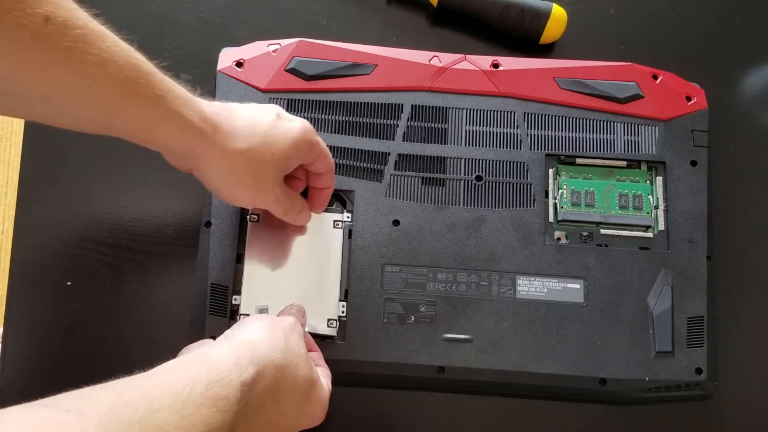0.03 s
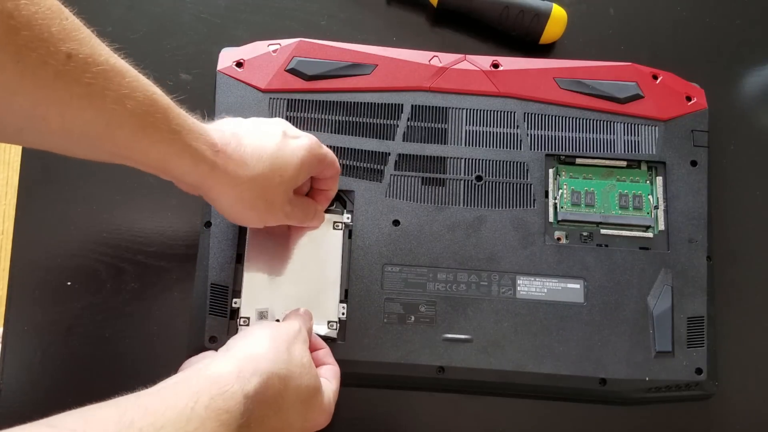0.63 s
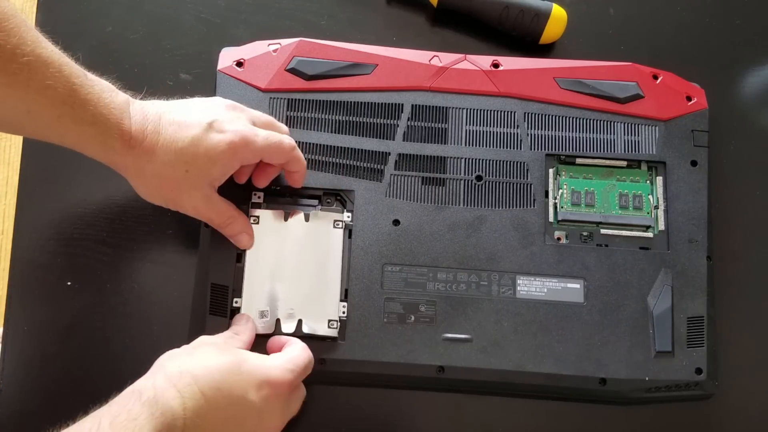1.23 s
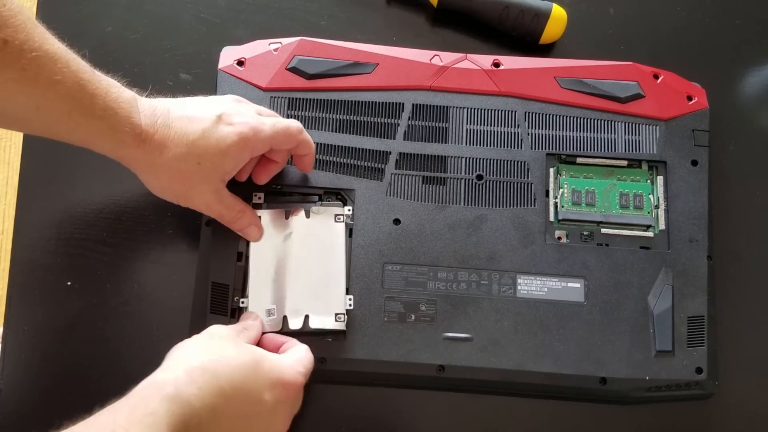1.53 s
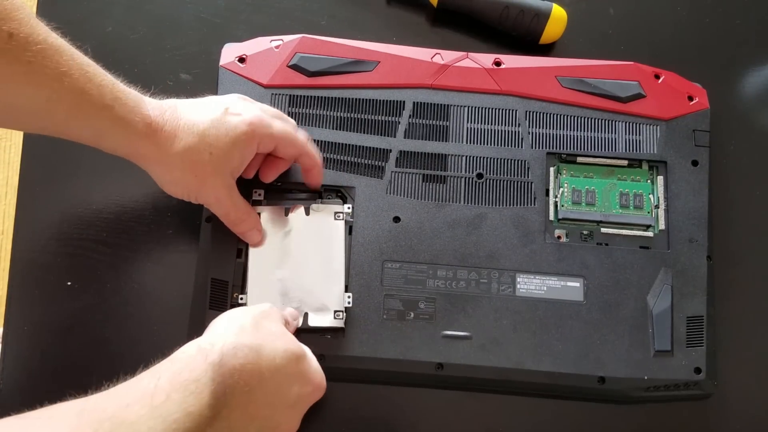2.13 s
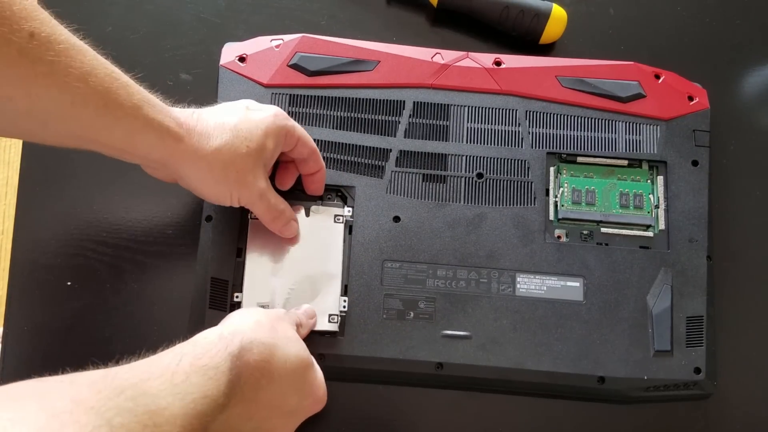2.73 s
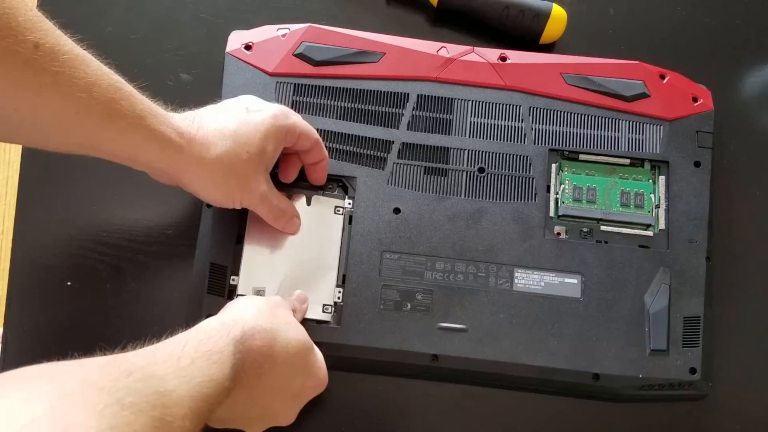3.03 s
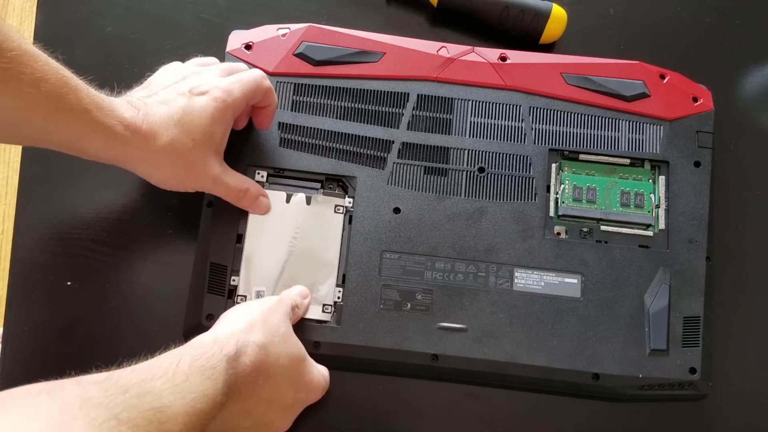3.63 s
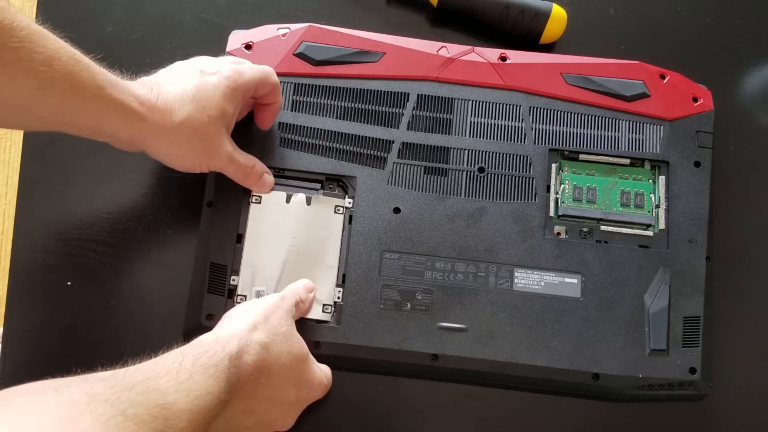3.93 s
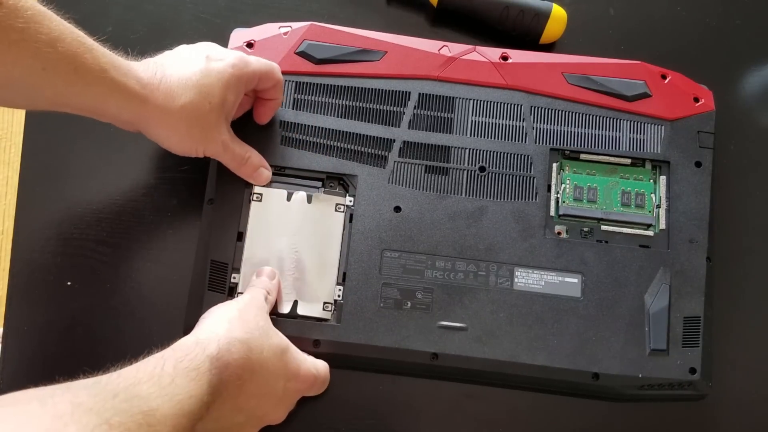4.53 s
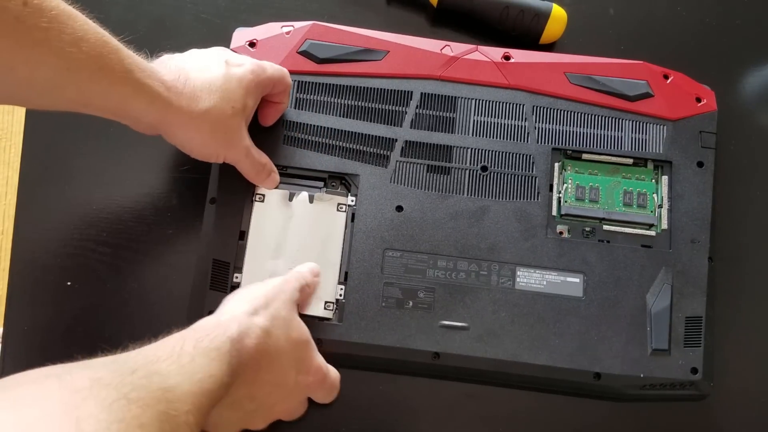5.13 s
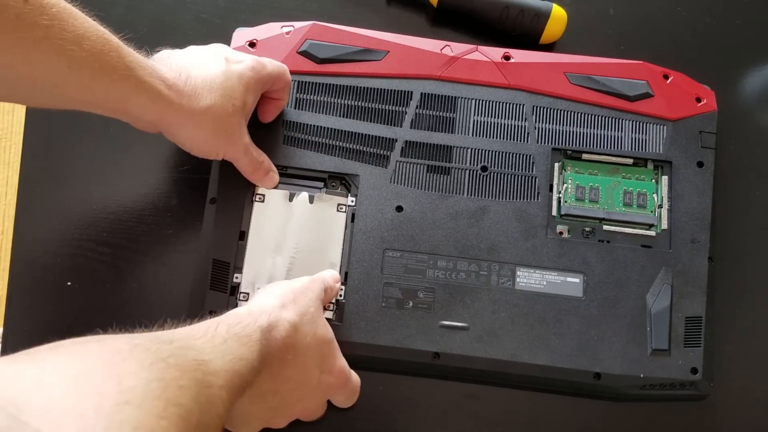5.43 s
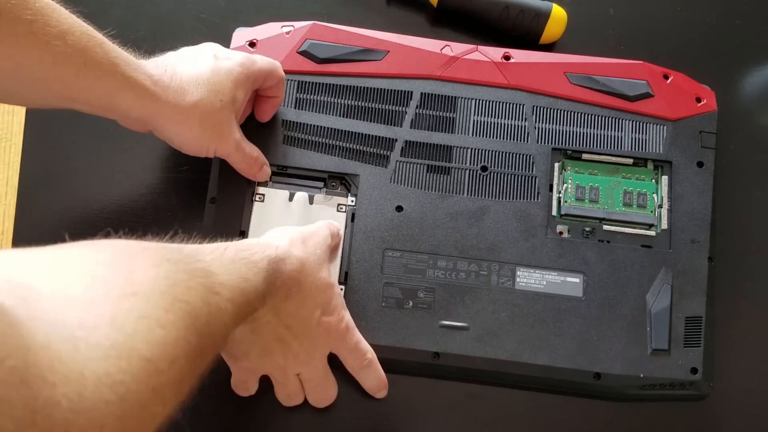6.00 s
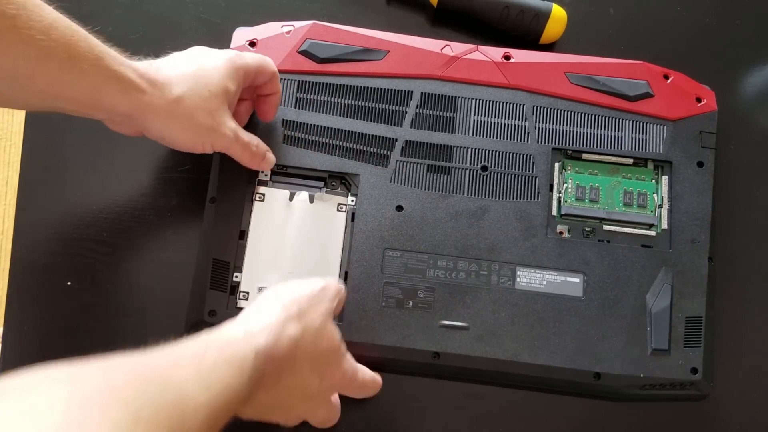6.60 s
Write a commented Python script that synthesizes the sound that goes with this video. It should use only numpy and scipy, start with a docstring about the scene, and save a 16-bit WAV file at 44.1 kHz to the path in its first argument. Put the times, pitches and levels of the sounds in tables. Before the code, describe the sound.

A small drive in a metal caddy is slid and pressed into the plastic bay of a laptop. A faint tick leads into soft scrapes and light taps, with bare metal corners clicking on the edges. Louder knocks ring the hollow case around the middle and again a little later, then the rubbing and ticking thin out. It is heard close, in stereo, in a quiet small room with a faint hum.

```python
"""A faint metal tick, then scrapes and light taps: a small drive in a metal caddy is being worked into
the plastic bay of a laptop on a desk. Each push grinds and hisses with tiny slips, bare corners tick
on the edges, and the caddy drops in with a few knocks that ring the hollow case. Heard from close by
on a pair of microphones, in a quiet small room with a short echo and a faint hum."""
import sys
import numpy as np
from scipy import signal
from scipy.fft import rfft, irfft, next_fast_len
from scipy.io import wavfile
from scipy.ndimage import uniform_filter1d

SR = 44100
rng = np.random.default_rng(int(sys.argv[2]) if len(sys.argv) > 2 else 0)


def dump_mix(stems):
    """Bounce the given channels to the path in sys.argv[1] as a 16-bit WAV at rate SR."""
    frames = np.atleast_2d(stems).T  # one column per channel
    limited = np.clip(frames, -1, 1)  # hard clip at full scale
    pcm = np.round(limited * 32767).astype(np.int16)
    wavfile.write(sys.argv[1], SR, pcm)


N = 298116
TIME = np.arange(N) / SR

# Knocks in the bay, close to the microphones. Each row: start in seconds, thud, clack and tick
# levels in dB, lowest pitch in Hz, favoured pitch in Hz, scuff t60 in seconds.
KNOCKS = [(1.409, -47, -35, -42.5, 130, 1970, 0.01), (1.418, -52, -50, -40.5, 130, 9300, 0.02),
          (1.4347, -45.5, -38, -47.5, 130, 1430, 0.025), (2.288, -47.5, -45, -49, 120, 620, 0.0074),
          (2.9008, -41, -24.5, -35.5, 195, 1350, 0.024), (3.073, -33.5, -23, -43.5, 110, 1700, 0.014),
          (3.083, -47, -31, -42, 110, 454, 0.0075), (3.301, -54, -44, -41.5, 99, 1070, 0.014),
          (3.9066, -49, -45.5, -40, 130.8, 1090, 0.0057), (4.427, -39.5, -27.5, -37.5, 184, 1040, 0.022),
          (4.45, -47, -43.5, -34.5, 129, 1300, 0.0037), (4.683, -53, -21, -32.5, 112, 1480, 0.0069),
          (4.688, -29, -31, -32.5, 128, 664, 0.008)]

def knocks():
    """The caddy drops or snaps against the bay: thud, clack and tick at once."""
    out = np.zeros((2, N))
    for start, *levels_db, lowest_hz, favoured_hz, scuff_t60 in KNOCKS:
        add(out, strike_case(levels_db, favoured_hz, scuff_t60, lowest_hz), start)
    return out


# Taps on the plastic. Each row: start in seconds, clack level in dB, favoured pitch in Hz.
TAPS = [(.554, -57, 1000), (.579, -46.5, 920), (.682, -38, 1600), (.879, -52.5, 1310), (0.965, -52, 800),
        (1.044, -47.5, 1620), (1.068, -39, 885), (1.278, -49.5, 1300), (1.671, -56, 403),
        (1.722, -43.5, 1490), (1.742, -42, 1530), (2.063, -52, 1440), (2.24, -55, 594), (2.64, -41, 710),
        (2.772, -51, 910), (3.066, -29, 1300), (5.124, -49, 800), (5.361, -50.5, 1060),
        (5.953, -53.5, 1060)]

def taps():
    """The caddy, damped by the fingers, bumps the plastic: mostly clack."""
    out = np.zeros((2, N))
    for start, db, favoured_hz in TAPS:
        add(out, strike_case([db - 15, db, db - 25], favoured_hz, scuff_t60=0.021), start)
    return out


# Ticks at the bay's edges. Each row: start in seconds, tick level in dB, favoured pitch in Hz.
TICKS = [(0.069, -56.5, 5000), (.675, -50, 7000), (.714, -49, 5000), (0.744, -52.5, 9500),
         (1.745, -49.5, 4530), (2.275, -38, 3250), (3.4433, -39, 13700), (4.638, -47, 6660),
         (4.82, -51, 6370), (5.349, -52, 4730), (5.704, -41.5, 4070), (6.633, -59, 2420)]

def ticks():
    """A bare metal corner catches an edge: mostly treble."""
    out = np.zeros((2, N))
    for start, db, favoured_hz in TICKS:
        add(out, strike_case([db - 24.5, db - 18, db], favoured_hz, scuff_t60=0.0055), start)
    return out


# Modes of the case with the caddy in it. Each row: pitch in Hz, level in dB, t60 in seconds.
CASE_MODES = [(74, -9.5, 0.18), (100.3, -6.5, 0.07), (128.2, -7, 0.15), (158.9, -5.5, 0.23),
              (213, -14.5, 0.043), (247.6, -12.5, 0.17), (291.6, -4.5, 0.061), (373, -5.5, 0.084),
              (495.5, -7, 0.05), (670, -1, 0.027), (800, 1.5, 0.018), (1036, -5, 0.056), (1300, -3, .025),
              (1480, -1, 0.009), (1911, -3, 0.035), (2300, 0, 0.013), (2470, -28, 0.0079),
              (3190, -33, 0.011), (4324, -4.5, 0.02), (5000, -3, 0.012), (6500, -21, 0.0098),
              (8000, -48, 0.0077), (10500, -32, 0.0099)]

def case_ring(t, scatter_db=3.0, detune=0.0092):
    """The hollow case rings, its modes weighted by where the blow lands and shifted by the grip."""
    hz, mode_db, t60 = np.transpose(CASE_MODES)
    weight, polarity, spread, grip = rng.standard_normal((4, len(hz)))
    gain = from_db(mode_db + scatter_db * weight) * np.sign(polarity)
    # short waves reach the two microphones out of step
    skew = .5 * spread * np.sqrt(1 - at_hz(MIC_LIKENESS, hz))
    phase = 2 * np.pi * np.outer(hz * (1 + detune * grip), t)
    decay = gain[:, None] * dying(t, t60[:, None])
    return np.array([(decay * np.sin(phase + side * skew[:, None])).sum(0) for side in (1, -1)])


# The crack at the point of contact. Each row: frequency in Hz, level in dB.
CRACK_SPECTRUM = [(100, -18), (400, -1), (1500, -4.5), (2600, -7.5), (4300, -10), (5600, -16.5),
                  (8000, -15), (9500, -20), (11000, -16), (16000, -21)]

def crack(t, scuff_t60, longest_t60=0.78):
    """A few milliseconds of crushing contact, with energy at every frequency."""
    burst = rfft(diffuse(len(t)) * dying(t, scuff_t60))
    flattened = irfft(burst / (abs(burst) + 0.017 * abs(burst).mean()), len(t))
    fade_out = (1 - t / t[-1]) ** 2
    snap = colour(flattened * dying(t, longest_t60) * fade_out, CRACK_SPECTRUM)
    return snap / snap[:, :SR // 500].std()


# The three zones of a blow: upper edges of thud, clack and tick in Hz.
ZONE_TOPS_HZ = [500, 2800, 17000]

def strike_case(levels_db, favoured_hz, scuff_t60, lowest_hz=228, crack_db=9.0, blow_s=0.0019):
    """One blow cracks and rings; only knocks rock the whole case and reach below the default lowest_hz."""
    t = TIME[:SR // 4]
    blow = case_ring(t) + from_db(crack_db) * crack(t, scuff_t60)
    blow = favour(blow, favoured_hz, boost_db=8.0, sharpness=3.6)
    # the longer the scuff, the more gently the force builds
    blow *= 1 - np.exp(-t / (0.069 * scuff_t60))
    out = 0
    for level_db, low, high in zip(levels_db, [lowest_hz, *ZONE_TOPS_HZ], ZONE_TOPS_HZ):
        zone = band(blow, low, high)
        power = uniform_filter1d((zone ** 2).mean(0), int(blow_s * SR), mode="constant")
        # neighbouring zones take opposite signs so that they join without a notch
        out = from_db(level_db) * zone / np.sqrt(power.max()) - out
    return out


# Metal rubbing plastic, a low grind and a high hiss. Each row: frequency in Hz, level in dB.
GRIND_SPECTRUM = [(60, -7.5), (150, 5), (230, -4), (380, 1), (800, 3), (1300, -3.5), (2000, -1),
                  (2800, -11.5), (4500, -42.5)]
HISS_SPECTRUM = [(1500, -48), (2800, -4), (4200, 4), (5800, -3.5), (8000, -3), (9500, -9.5), (13000, -4.5),
                 (16000, -6)]
# Pushes along the bay. Each row: hardest moment in seconds, length in seconds, grind level in dB,
# favoured pitch in Hz.
PUSHES = [(0.568, 0.037, -54, 920), (0.625, 0.051, -52.5, 3620), (0.736, 0.21, -61.5, 3820),
          (0.986, 0.41, -64.5, 1730), (1.066, 0.098, -50, 1020), (1.176, 0.45, -60.5, 2480),
          (1.413, 0.08, -44.5, 1800), (1.691, 0.11, -54, 365), (1.734, 0.11, -49, 1110),
          (2.0, 0.12, -68.5, 4900), (2.14, 0.14, -61.5, 1810), (2.267, 0.048, -44, 3160),
          (2.338, 0.091, -50.5, 1740), (2.536, 0.16, -57, 1460), (2.645, 0.042, -49.5, 800),
          (2.797, 0.04, -57.5, 1790), (2.898, 0.03, -41, 1880), (3.429, 0.062, -58, 2180),
          (3.553, .08, -59, 2000), (3.854, .11, -61.5, 3000), (4.304, 0.2, -64.5, 4030),
          (4.418, 0.037, -56, 1700), (5.12, 0.47, -62, 1475), (5.671, 0.19, -53, 1660),
          (5.702, 0.067, -47, 4500), (6.094, 0.11, -62, 1060), (6.682, 0.18, -58.5, 171)]

def scrapes(slips_per_s=3000, slip_spread_db=5.0, smooth_share=0.74, judder_db=3.0):
    """Friction: a dense run of tiny slips that swells and fades with each push."""
    slipping = rng.random(N) < slips_per_s / SR
    slips = slipping * from_db(slip_spread_db * np.minimum(rng.exponential(1, N), 4))
    grain = rms_one(signal.lfilter([1], [1, -.85], slips))
    friction = diffuse(N) * (grain + smooth_share) * from_db(judder_db * drift(140))
    grind, hiss = colour(friction, GRIND_SPECTRUM), colour(friction, HISS_SPECTRUM)
    out = np.zeros((2, N))
    for peak_s, length, grind_db, favoured_hz in PUSHES:
        # a sharper edge hisses more: 6.5 dB an octave, level with the grind at 4140 Hz
        hiss_db = grind_db + 6.5 * np.log2(favoured_hz / 4140)
        span = slice(max(0, int((peak_s - length) * SR)), int((peak_s + length) * SR))
        push = from_db(-40 * abs(TIME[span] - peak_s) / length)
        for layer, level_db in (grind, grind_db), (hiss, hiss_db):
            rub = favour(layer[:, span], favoured_hz, boost_db=9.0, sharpness=1.5)
            out[:, span] += push * from_db(level_db) * rms_one(rub)
    return out


def favour(x, hz, boost_db, sharpness):
    """The point of touch brings out one region of the spectrum."""
    b, a = signal.iirpeak(hz, sharpness, fs=SR)
    return x + (from_db(boost_db) - 1) * signal.lfilter(b, a, x + 1e-18)


# The bay's direction from the microphones. Each row: frequency in Hz, left minus right in dB.
BAY_BALANCE = [(60, -1), (130, 1), (290, 0), (640, 2), (1410, -4.5), (3100, -3), (6820, -1.5), (15000, 3.5)]

def at_microphones(x, left_lag_s=7e-5):
    """Each microphone hears the bay in its own colour; the left one is a little farther away."""
    left = colour(x[0], [(hz, db / 2) for hz, db in BAY_BALANCE])
    right = colour(x[1], [(hz, -db / 2) for hz, db in BAY_BALANCE])
    return np.array([np.interp(TIME - left_lag_s, TIME, left), right])


# Decay of the small room around the desk. Each row: frequency in Hz, t60 in seconds.
ROOM_T60 = [(100, 0.85), (260, 0.5), (700, 0.49), (1800, 0.51), (4800, 0.49), (8000, 0.49), (14000, 0.45)]
# Colour of its echoes. Each row: frequency in Hz, level in dB.
ECHO_SPECTRUM = [(60, 1), (150, 2), (220, -1.5), (400, -0.5), (800, -1.5), (1400, -3.5), (2100, -2),
                 (2800, -1.5), (4400, -3.5), (8000, 0), (9600, -6), (16000, -5)]

def room(x, tail_db=-3.5, early_db=-9.0, early_t60=0.079, gap_s=0.0014, build_s=0.0086):
    """Quick echoes off desk and laptop, then a tail that dies band by band."""
    t = TIME[:SR]
    noise, hz = rfft(diffuse(len(t))), np.fft.rfftfreq(len(t), 1 / SR)
    tail = 0
    for centre_hz, t60 in ROOM_T60:
        share = at_hz([(f, f == centre_hz) for f, _ in ROOM_T60], hz)
        tail += irfft(noise * share, len(t)) * dying(t, t60)
    early = diffuse(len(t)) * dying(t, early_t60)
    arrival = np.clip((t - gap_s) / build_s, 0, 1)
    echoes = from_db(tail_db) * rms_one(tail * arrival) + from_db(early_db) * rms_one(early * arrival)
    return signal.fftconvolve(x, colour(echoes, ECHO_SPECTRUM) / np.sqrt(len(t)), axes=1)[:, :N]


# Room tone at the desk. Each row: frequency in Hz, level in dB.
AIR_SPECTRUM = [(20, -2.5), (27, -26.5), (48, -10.5), (101, -8), (200, -12.5), (400, -14), (650, -17),
                (2000, -25), (4000, -30), (7300, -37.5), (10000, -37.5), (14700, -30), (16000, -34.5)]

def room_tone(air_db=-64.5, hum_hz=384, hum_db=-74, hum_waver=0.27):
    """Still room air, microphone hiss and a faint wavering hum."""
    hum_gain = from_db(hum_db) * (1 + hum_waver * drift(2.5))
    hum = hum_gain * np.sin(2 * np.pi * hum_hz * TIME + drift(11))
    return from_db(air_db) * rms_one(colour(diffuse(N), AIR_SPECTRUM)) + hum


# How alike the two microphones hear. Each row: frequency in Hz, correlation from 0 to 1.
MIC_LIKENESS = [(150, .985), (300, .95), (600, .75), (1200, .35), (2500, .22), (12000, 0)]

def diffuse(size):
    """White stereo noise, alike at both microphones in the bass only."""
    padded = next_fast_len(size, True)
    mid, side = rfft(rng.standard_normal((2, padded)))
    alike = at_hz(MIC_LIKENESS, np.fft.rfftfreq(padded, 1 / SR))
    mid, side = mid * np.sqrt((1 + alike) / 2), side * np.sqrt((1 - alike) / 2)
    return irfft([mid + side, mid - side], padded)[:, :size]


def drift(per_s):
    """A random wander of rms 1, with per_s turning points a second."""
    knots = rng.standard_normal(int(per_s * N / SR) + 2)
    return rms_one(np.interp(TIME * per_s, np.arange(len(knots)), knots))


def colour(x, spectrum):
    """Causal (minimum-phase) filter that follows a spectrum."""
    size = next_fast_len(x.shape[-1] + SR // 10, True)
    hz = abs(np.fft.fftfreq(size, 1 / SR))
    log_gain = np.log(from_db(at_hz(spectrum, hz)))
    response = np.exp(np.conj(signal.hilbert(log_gain)))[:size // 2 + 1]
    return irfft(rfft(x, size) * response, size)[..., :x.shape[-1]]


def band(x, low_hz, high_hz):
    """Causal band-pass."""
    return signal.sosfilt(signal.butter(2, [low_hz, high_hz], "band", fs=SR, output="sos"), x + 1e-18)


def at_hz(points, hz):
    """Read a table on a log-frequency axis."""
    knots, values = np.transpose(points)
    return np.interp(np.log(np.maximum(hz, 1)), np.log(knots), values)


def dying(t, t60):
    """Decay that loses 60 dB in t60 seconds."""
    return np.exp(-np.log(1000) * t / t60)


def from_db(db):
    """Decibels to gain."""
    return 10 ** (np.asarray(db) / 20)


def rms_one(x):
    """Scale to rms 1."""
    return x / np.sqrt(np.mean(x ** 2) + 1e-20)


def add(out, sound, start_s):
    """Mix a stereo sound in at a moment."""
    at = int(start_s * SR)
    out[:, at:at + sound.shape[1]] += sound[:, :N - at]


def scene():
    """The work on the laptop close to the microphones, the room behind it."""
    work = at_microphones(knocks() + taps() + ticks() + scrapes())
    return work + room(work) + room_tone()


def record(dry):
    """The top is cut steeply above 16200 Hz."""
    return signal.sosfilt(signal.ellip(10, .1, 70, 16200, fs=SR, output="sos"), dry)


dry = scene()
out = record(dry)
dump_mix(out)
```